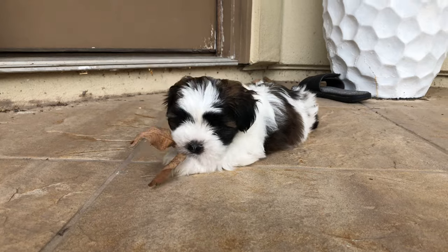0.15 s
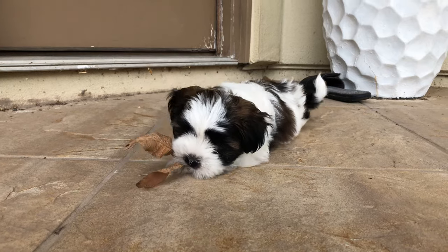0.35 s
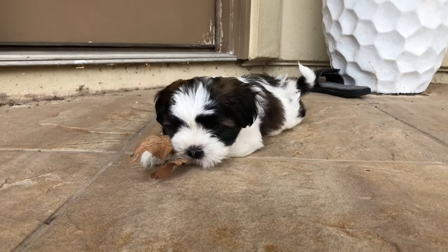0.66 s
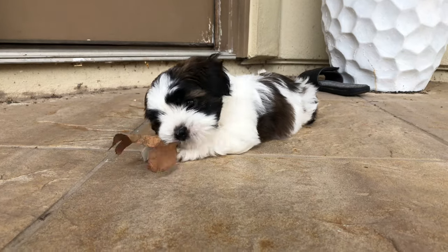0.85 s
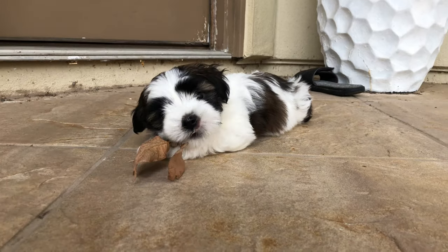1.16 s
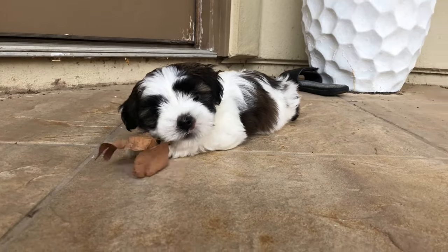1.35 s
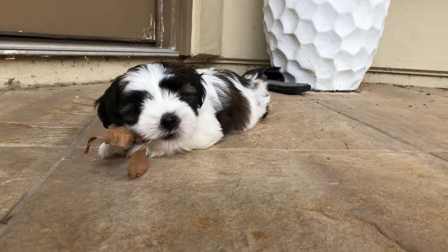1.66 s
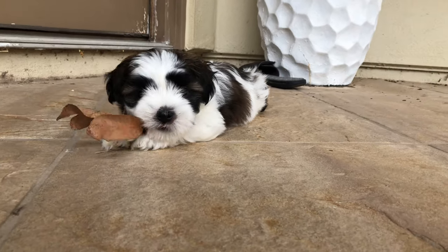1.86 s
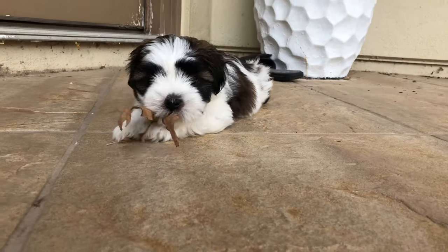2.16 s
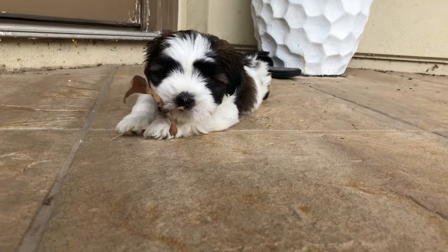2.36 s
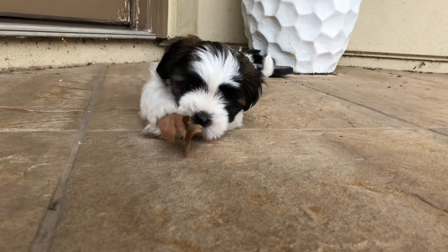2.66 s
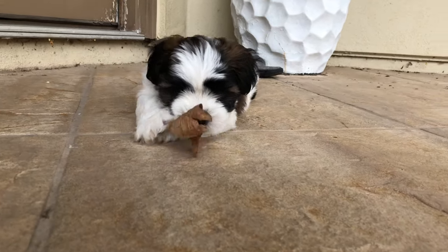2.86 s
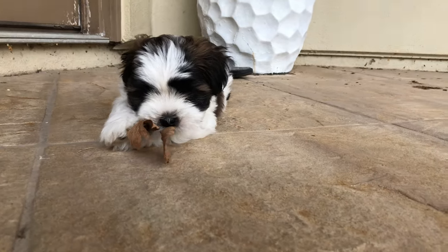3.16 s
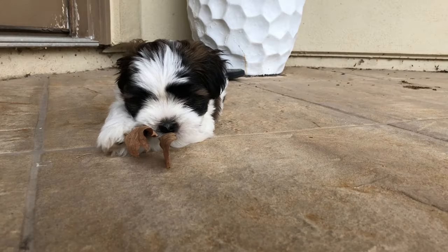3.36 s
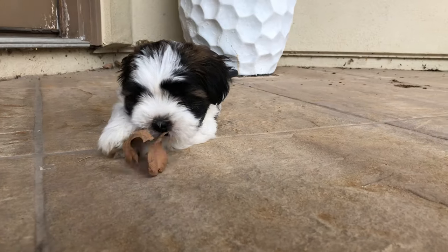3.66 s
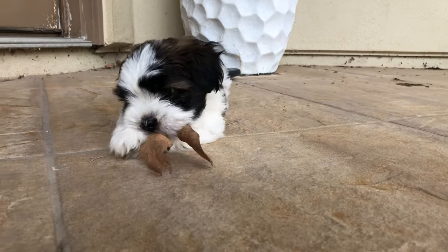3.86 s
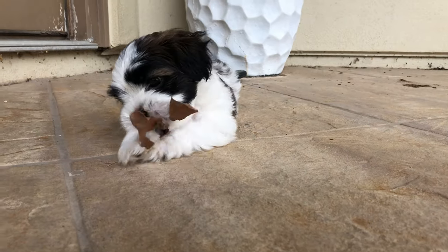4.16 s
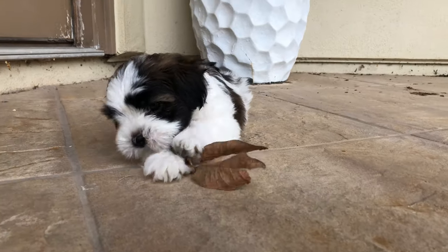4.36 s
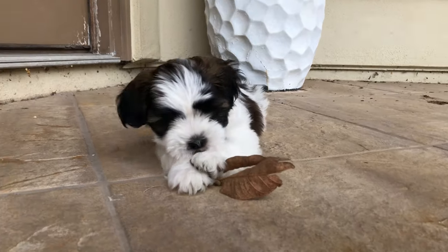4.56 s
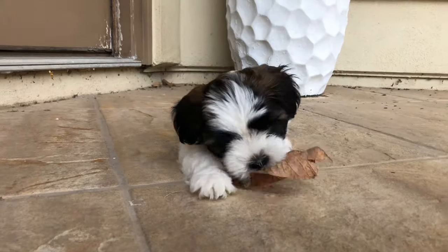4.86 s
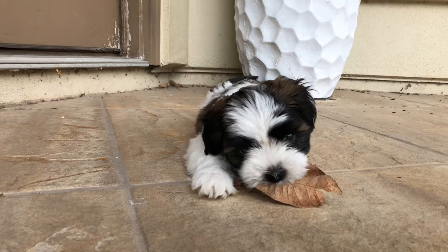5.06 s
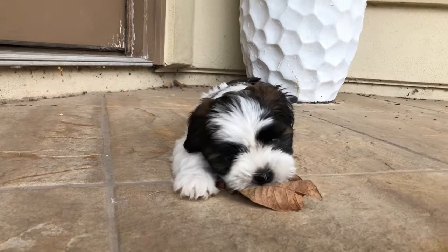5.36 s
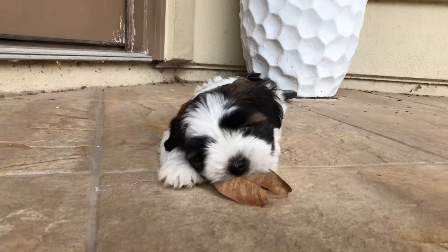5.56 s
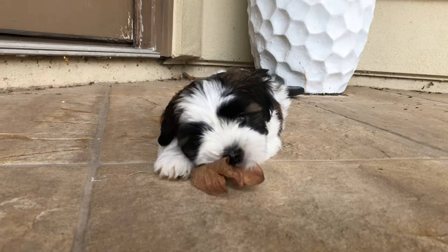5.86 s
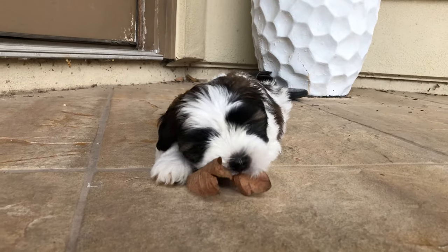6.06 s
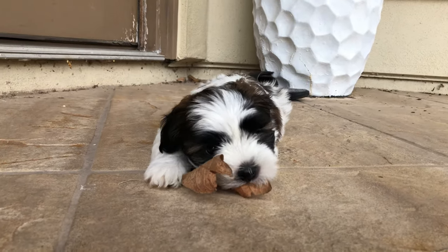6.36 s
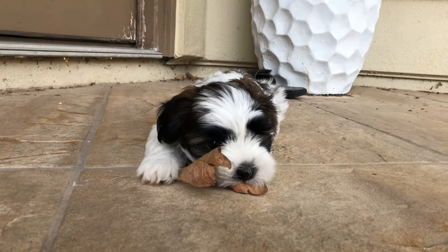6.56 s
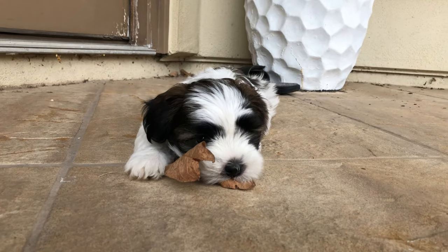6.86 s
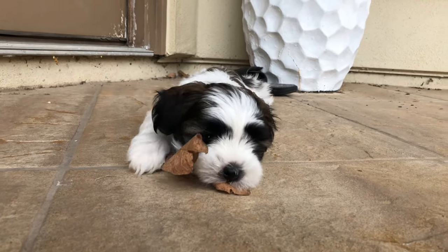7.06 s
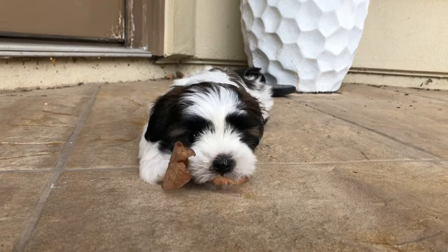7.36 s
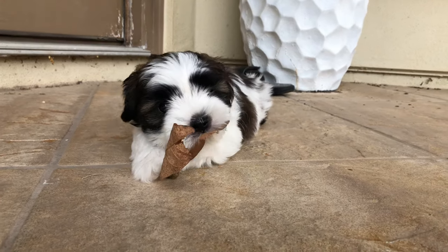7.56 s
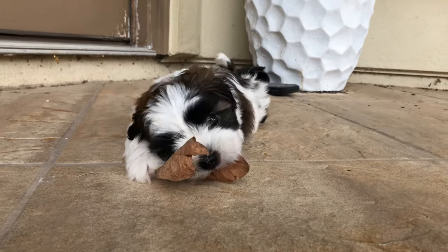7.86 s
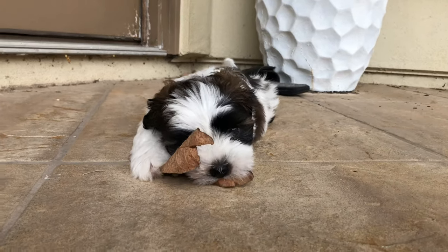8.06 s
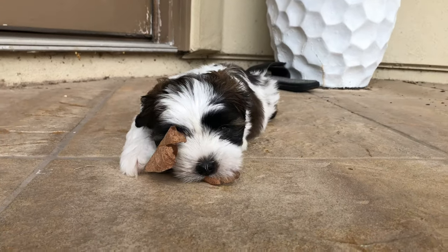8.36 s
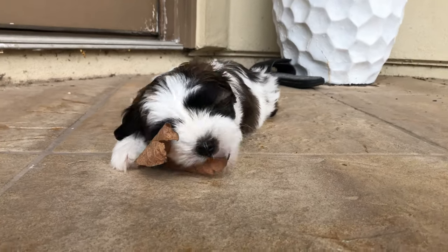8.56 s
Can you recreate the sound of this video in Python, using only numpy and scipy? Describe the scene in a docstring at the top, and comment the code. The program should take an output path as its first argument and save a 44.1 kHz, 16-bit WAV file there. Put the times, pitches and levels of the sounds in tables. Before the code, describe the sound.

Close, dry crackles of a brittle leaf being chewed by a puppy on a tiled porch. Small snaps and scrapes come in uneven bursts, thin out, then build to a dense, loud crunch past the middle before breaking into isolated sharp clicks. Behind them lie a steady high insect whirr, soft traffic and breeze, a faint low hum and a few distant bird whistles. Phone microphone near the floor, almost no echo.

```python
"""A tiled porch: a puppy chews a brittle dry leaf close to a phone held near the floor.
The leaf snaps (short noise runs through a resonance) and crackles and scrapes (dense coloured ticks).
Behind lie a distant bird (sliding sines), a steady high insect whirr (a comb of tones), a low hum
(a wavering sine) and far traffic and breeze (shaped noise)."""
import sys
import numpy as np
from scipy import signal
from scipy.fft import rfft, irfft, next_fast_len
from scipy.io import wavfile
from scipy.ndimage import uniform_filter1d

SR = 44100
rng = np.random.default_rng(int(sys.argv[2]) if len(sys.argv) > 2 else 0)


def generate_wav(signal):
    """Clip the signal to [-1, 1] and save it as 16-bit WAV at the path in sys.argv[1]."""
    frames = np.transpose(np.atleast_2d(signal))
    scaled = np.clip(frames, -1, 1) * 32767
    pcm = np.round(scaled).astype(np.int16)
    wavfile.write(sys.argv[1], SR, pcm)


def natural_amplitude(level_db):
    """Convert a level in decibels to a linear amplitude factor, elementwise."""
    exponent = np.asarray(level_db, float) / 20
    return 10 ** exponent


N = 384111


def on_log(hz, points):
    """Reads (Hz, dB) points on a log-frequency axis."""
    f, db = np.transpose(points)
    return np.interp(np.log(np.maximum(hz, 1)), np.log(f), db)


def walk(rate_hz):
    """Random levels of unit spread, rate_hz a second, joined by straight lines."""
    knots = rng.standard_normal(int(N / SR * rate_hz) + 2)
    return np.interp(np.arange(N) * rate_hz / SR, np.arange(len(knots)), knots)


def leaf(hz, ring_hz, body_db, treble_db, width, ring_db):
    """Response of the curled leaf: a broad slope with one main ringing hollow."""
    slope_db = on_log(hz, [(250, body_db - 11.5), (900, body_db + 1.0), (1700, body_db),
                           (2600, 0.0), (4800, 0), (7500, treble_db),
                           (11000, treble_db), (16000, treble_db - 5.5)])
    u = hz / ring_hz
    rings = 0
    # a smaller fold beside the hollow rings lower and weaker
    for gain, v in [(1, u), (0.14, 1.654 * u)]:
        rings = rings + gain * 1j * width * v / (1 - v ** 2 + 1j * width * v)
    return natural_amplitude(slope_db) * (1 + natural_amplitude(ring_db) * rings)


# Clear snaps of the leaf. Each row: peak time in s, level in dB, ring in Hz, body re middle in dB,
# treble re middle in dB, nominal length in ms (snaps() takes off 0.6).
SNAP_ROWS = [(.116, -46, 2960, 8, -5, 3.4), (.247, -41, 9000, 1, -2, 7), (.3539, -38, 2520, 5, -18, 3.3),
             (.425, -42, 4460, 5, 2, 6.8), (.481, -32, 4250, 2, -6, 4), (.5604, -35, 4030, -2.5, -9, 14),
             (.59, -34.5, 4100, -7, -20, 11), (.6868, -33.5, 3400, -13, -2, 4.4),
             (.695, -36, 3380, -13, -5, 2.4), (.741, -34, 3230, -11, 1, 2.4),
             (.7616, -34, 3700, -8, -6, 11), (.7826, -28.5, 3050, -1, -13, 12),
             (.7974, -36, 3020, -16, -21, 3.2), (.813, -32, 2800, 1, -16, 8.7),
             (.8383, -31.5, 3060, 4, -7, 2), (.8523, -37, 2910, -3, 13, 5.6),
             (.9302, -34.5, 3730, -6, -5, 2.2), (.955, -43, 2890, -8, -9, 2.2),
             (1.0799, -31.5, 2660, -3, -2.5, 2.5), (1.12, -45.5, 2000, 0, -10, 2.8),
             (1.1774, -35, 2820, 6, -3, 3.3), (1.228, -38, 2840, 12, 4, 3.9),
             (1.4498, -30, 3900, -15, 2, 9.3), (1.472, -34, 3040, -25, -7, 5.9),
             (1.5368, -28.5, 1880, 10, 8, 2.1), (1.554, -34, 1100, 9, 5, 5.1),
             (1.6148, -39.5, 10200, 5.5, -5, 2.4), (1.696, -44, 2970, -5, -2, 6.6),
             (1.9845, -44.5, 3150, 4, -4, 5.2), (2.0784, -44, 3570, 6, 2, 4),
             (2.0964, -42.5, 3750, 0.5, -10.5, 8.2), (2.2617, -40, 7100, -3, 5, 0.74),
             (2.7765, -37, 4970, -19.5, 5, 2.4), (2.8043, -34, 9750, -7, -2, .9),
             (2.8416, -31.5, 7000, -13, -8, 6), (2.9326, -42, 1980, -4, -21, 2.7),
             (2.9417, -35.5, 4540, -8, 5, 3.9), (2.993, -29, 5100, -17, 0, 6.9),
             (3.056, -30.5, 11300, -8, 6, 1.3), (3.0998, -38, 3870, -15, -10, 3.3),
             (3.737, -32, 7750, -17, -1, 13), (3.7972, -34.5, 7140, -17, 0, 2.8),
             (3.8154, -37, 3750, 15, 4, 8.4), (3.857, -37, 1960, 5, 3, 5), (3.8654, -37, 2370, 2, 6, 2.8),
             (3.9687, -40, 10380, 6, -6, 3.8), (4.2061, -35, 2540, -2, -0.5, 1.6),
             (4.3066, -40, 5510, -10, 2.5, 2.2), (4.3893, -17.5, 4420, 4.5, 0, 1.7),
             (4.4087, -12, 2430, -4, -4.5, 5.3), (4.4681, -30, 1440, 4, -17, 2.4),
             (4.8598, -36, 3800, 3, -4, 5.8), (4.8866, -21, 3170, 4, -8, .7),
             (4.9389, -29.5, 2750, 3, 2, 9.1), (4.9781, -33, 1510, 2.5, -19, 1.7),
             (5.107, -37, 4070, 6, -2, 3.7), (5.1215, -32, 3400, 4, -3.5, 5),
             (5.1411, -19, 3760, -12, -3, 1.7), (5.1504, -21.5, 3450, -3, -1, 1.9),
             (5.1551, -21, 5860, 10, 8, 1.5), (5.1613, -12, 6740, -6.5, -4.5, 2.2),
             (5.2101, -27, 3660, -8, 0, 1.6), (5.3176, -37, 1390, 0, -21, 2.4),
             (5.364, -34, 2760, -5, -2, 1.3), (5.3834, -35.5, 7550, 0, -5, 5.4),
             (5.4249, -32.5, 6290, -2, -4, 1.7), (5.4295, -30.5, 3510, 3, 0, 2.4),
             (5.4496, -30, 3670, -6, -5, 2.1), (5.4555, -30.5, 4150, 5, -3, 5.1),
             (5.488, -20, 2970, -5, -1, 3), (5.5054, -17.5, 3950, -9, -3, 3.4),
             (5.5155, -25, 3450, -8, -7, 5.1), (5.5247, -28, 3080, 3, 2, 2.4),
             (5.5414, -16.5, 3250, -8.5, -3, 5), (5.5606, -24.5, 3200, -1, -4, 2.5),
             (5.5669, -27, 2290, -11, -7, 3.2), (5.577, -26, 3210, -14, -3, 3.4),
             (5.5944, -32.5, 2330, 2, -5, 2.7), (5.6085, -14.5, 3430, -1.5, -2.5, 4.7),
             (5.623, -30, 3500, 11, -2, 5), (5.636, -21, 6500, -5, -4, 6.4),
             (5.647, -23.5, 3330, -3, -5, 6.4), (5.6786, -21, 3220, 3.5, -1.5, 4.5),
             (5.7525, -31, 3800, 1.5, -4, 4.4), (5.7655, -24, 3280, 1.5, -1, 6.6),
             (5.8211, -32, 3400, 5, -2.5, 7.6), (5.8927, -34.5, 5170, -14.5, -1.5, 1.2),
             (5.8988, -30.5, 2500, -9, -2, 1.3), (5.9362, -32, 6290, -9, 4, 2.8),
             (6.0361, -36.5, 5770, 12, 2, 2.4), (6.1025, -33.5, 1490, 2, -10, 3),
             (6.1148, -35, 1420, 3, -10, 1.1), (6.1354, -34.5, 1420, 9, -11, 1.9),
             (6.1557, -34, 1170, 13, 5, 0.71), (6.1605, -21.5, 3530, 2, 2, 0.68),
             (6.167, -27, 1380, 2, -7, 2.1), (6.1838, -35, 1590, 4, 9, 2.7), (6.1878, -40, 1340, 9, 3, 1.8),
             (6.2167, -30.5, 1480, 6, -7, 2.7), (6.2422, -33.5, 3510, -3, 3, 1.2),
             (6.2781, -42.5, 2630, 5, -2, 1.8), (6.362, -38, 3720, 4, -10, 5.8),
             (6.462, -19, 11400, 0.5, -2, 2.7), (6.4911, -38, 5880, -14.5, 11, 1.3),
             (6.5276, -24.5, 9700, -6, -5, 1.9), (6.5382, -28, 3060, -19, 10, 1.6),
             (6.5475, -33.5, 2910, -8.5, 2, 1.3), (6.5795, -39, 8310, -19, -2.5, 1.5),
             (6.5925, -35, 8530, -11, 1, 1.3), (6.962, -44, 2930, -9, -10, 2),
             (6.9765, -44, 2900, -11.5, -10, 2.7), (6.99, -36, 2900, -11, -15, 1.4),
             (7.1012, -13, 9400, -12.5, 2, 2), (7.1183, -35, 3600, 4.5, -16, 1.3),
             (7.19, -36.5, 5750, 2.5, 12, 1), (7.3487, -37.5, 4930, 7, 2.5, 1.9),
             (7.3646, -42, 6120, 5, 8, 2), (7.541, -43.5, 4460, -5, -6, 1.6),
             (7.5858, -14.5, 5020, -9.5, 5, 1.7), (7.792, -41, 6400, 4, -5, 3.5),
             (7.9685, -29, 4840, 1.5, -17, 2.1), (8.007, -32, 3320, 4, -3, 2.8),
             (8.0497, -13.5, 10100, -11, 1.5, 2.4), (8.063, -29, 9840, -10, -10, 1.7),
             (8.0737, -31, 9840, -6, 1, 1.2), (8.0793, -22, 2570, -7, 5, 1.7),
             (8.1081, -37, 4010, -36, 2, 1.4), (8.1291, -19, 11600, -18, -5, 1.1),
             (8.1366, -29, 5790, -12, -5, 1.3), (8.1522, -32, 6010, -8, 6, 0.9),
             (8.1585, -15, 4550, -14, 1.5, 0.75), (8.2522, -39, 1380, -1, -21, 3.3),
             (8.456, -39, 1210, 0, 6, 1.9), (8.59, -34, 4610, -12, 6, 1.2),
             (8.6245, -18.5, 2740, -9, -12, 3.8), (8.6317, -38, 6600, -12, -2, 4.5),
             (8.6666, -33, 2930, 6, -10, 3.9)]


def snaps():
    """Each snap is a quick run of tiny fractures that swells, dies away and rings the leaf."""
    size, lead = 2048, 256  # samples
    out = np.zeros(N + size)
    t_ms = (np.arange(size) - lead) / SR * 1000
    hz = np.fft.rfftfreq(size, 1 / SR)
    chance = rng.standard_normal((len(SNAP_ROWS), 2, size))
    for row, (noise, scatter) in zip(SNAP_ROWS, chance):
        peak_s, level_db, ring_hz, body_db, treble_db, nominal_ms = row
        ms = max(nominal_ms - .6, .25)
        run = np.where(t_ms < 0, np.exp(t_ms / (.22 * ms)), np.exp(-t_ms / (.65 * ms)))
        fractures = run * noise * natural_amplitude(5.6 * scatter)
        response = leaf(hz, ring_hz, body_db, treble_db, width=0.087, ring_db=8.4)
        snap = irfft(rfft(fractures) * response)
        loudest_rms = np.sqrt(uniform_filter1d(snap ** 2, size=40).max())
        i = int(peak_s * SR) - lead
        out[i:i + size] += natural_amplitude(level_db) * snap / loudest_rms
    return out[:N]


# Bites and pushes that crease the leaf. Each row: peak time in s, level in dB, leaf ring in Hz,
# treble re middle in dB, time to swell 20 dB in s, time to fade 20 dB in s (crunch_db() floors both).
CRUNCH_ROWS = [(.247, -58.5, 3540, 4.5, 0.3, .1), (.36, -58.5, 3490, 3, -0.36, 0.6),
               (.44, -63, 4500, -5, 0.4, 1.5), (0.469, -41, 2600, -7, .015, 0.15),
               (0.49, -38.5, 4180, -8.5, 0.05, 0), (.57, -41, 4090, -11, 0.03, -0.05),
               (0.679, -43, 4830, -2, 0.07, 0.01), (.75, -43, 3300, 0, 0.06, -0.02),
               (.8, -39, 3000, -5.5, 0.12, 0.14), (1.085, -57.5, 2800, -13, 0.2, 0.7),
               (1.177, -43.5, 2820, -3, 0.04, 0.22), (1.231, -46, 1390, -9, 0.13, 0.02),
               (1.39, -54, 2500, -2, -0.7, 0.66), (1.435, -47.5, 3830, -3, -0.22, 0.16),
               (1.546, -44, 2000, -9, 0.02, 0.11), (1.63, -49.5, 1450, -19, 0.15, 0.1),
               (1.77, -64.5, 1610, -12, .06, 0.4), (1.995, -62, 3100, -5, 0.2, -0.07),
               (2.1, -63, 3670, -2, 0.46, 0.2), (2.368, -60, 1700, -4, 0.3, 0.4),
               (2.759, -44.5, 3480, -4, -0.03, 0.1), (2.836, -47.5, 2480, -4.5, 0.18, 0.27),
               (2.95, -49.5, 3460, -1, .03, 0.27), (3.06, -55, 2600, -10, 0.26, .5),
               (3.74, -59, 2620, -6, 0.23, 0.3), (3.81, -47, 3530, -1, 0.08, 0.22),
               (3.865, -51.5, 2330, -6, 0.23, 0.22), (4.0, -65.5, 3000, 5, -0.4, 0.8),
               (4.22, -58, 2840, -1, -0.04, 0.7), (4.33, -62, 2860, 0, -0.1, 0.7),
               (4.412, -34, 2480, -9, 0.02, 0.0849), (4.484, -37, 4000, -3.5, 0.02, .04),
               (4.835, -51, 4150, -10, 0.3, .06), (4.9, -37.5, 2070, -7, 0.04, .035),
               (4.943, -32.5, 4100, 0, -0.01, -0.04), (4.98, -50.5, 2300, -13, 0.24, 0.12),
               (5.159, -32.5, 3650, -3.5, -0.0227, .06), (5.35, -51.5, 3720, -8, 0.4, 0.4),
               (5.45, -47, 4130, -10, -0.48, 0.2), (5.504, -24, 4150, 1.5, -0.016, -0.01),
               (5.567, -44, 2970, -6, -0.11, 0.33), (5.626, -27.5, 3620, 3, -0.04, -0.0019),
               (5.683, -32.5, 3400, -5, -0.18, -0.11), (5.76, -40, 3530, -6, -0.48, 0.06),
               (5.8, -51, 3300, -5, 0.2, 0.25), (5.9, -60, 2450, -4, -0.2, .12),
               (6.11, -42.5, 1530, -25, 0.05, -0.59), (6.186, -35, 1600, -5, 0.04, .075),
               (6.39, -54, 3900, -9, 0.2, 0.33), (6.465, -55.5, 1250, 1, 0.24, 0.17),
               (6.53, -53.5, 2630, 5, 0.26, 0.16), (6.69, -59, 2970, -9, 0.2, 0.13),
               (6.995, -52.5, 2970, -24.5, 0.1, 0.13), (7.108, -40.5, 3600, -2, 0.02, 0.04),
               (7.228, -53.5, 2460, -10, 0.13, 0), (7.33, -52, 1700, -6.5, 0.18, 0),
               (7.48, -55.5, 2700, -4.5, .08, 0.1), (7.535, -53.5, 4400, -2, 0.36, 0.24),
               (7.595, -57, 4860, 3, -0.1, 0.37), (7.71, -46, 2940, 2.5, -0.12, 0.03),
               (7.79, -54, 3700, 2, 0.16, -0.1), (8.005, -54.5, 3320, -2, 0.2, 0.4),
               (8.06, -51.5, 4420, 5, 0.24, 0.14), (8.16, -52.5, 4850, 4, 0.25, 0.15),
               (8.23, -75, 3830, -9, -7.9, 12), (8.626, -53, 2870, 2, 0.16, 0.2),
               (8.663, -50, 1500, -6, 0.08, -0.1)]


def crunch_db(t):
    """Level of every crunch over time: a swell to the peak, then a fade, both straight in dB."""
    peak_s, level_db, _, _, swell_s, fade_s = np.transpose(CRUNCH_ROWS)[:, :, None]
    slope_s = np.maximum(np.where(t > peak_s, fade_s, swell_s), .005)
    return level_db - 20 * np.abs(t - peak_s) / slope_s


# Fullness of the leaf by its ring. Each row: ring in Hz, body re middle in dB.
BODY_BY_RING = [(1500, 4), (4000, 1.5)]
TICKS_PER_S, TICK_SPREAD_DB = 8000, .5
BUNCHES_PER_S, BUNCH_MS, BUNCH_SPREAD_DB, BETWEEN_DB = 350, 2.5, 2, -7
RING_WIDTH, RING_DB = .13, 5


def rustle():
    """Dense uneven ticks of creasing and scraping; the hollow they ring changes as the leaf is bent."""
    ticks = (rng.random(N) < TICKS_PER_S / SR) * rng.standard_normal(N)
    ticks = ticks * natural_amplitude(TICK_SPREAD_DB * rng.exponential(size=N))
    starts = (rng.random(N) < BUNCHES_PER_S / SR) * natural_amplitude(BUNCH_SPREAD_DB * rng.standard_normal(N))
    bunches = signal.lfilter([1], [1, -np.exp(-1000 / BUNCH_MS / SR)], starts)
    ticks = ticks * (natural_amplitude(BETWEEN_DB) + bunches)

    grid_s = np.arange(0, N / SR, .001)
    effort = np.sqrt(np.sum(natural_amplitude(crunch_db(grid_s)) ** 2, axis=0))
    ticks = ticks / ticks.std() * np.interp(np.arange(N) / SR, grid_s, effort)

    hz, frame_s, z = signal.stft(ticks, SR, nperseg=512, noverlap=384)
    band = (hz > 1200) & (hz < 5200)  # crunch levels hold for this band
    colours = []
    for _, _, ring_hz, treble_db, *_ in CRUNCH_ROWS:
        body_db = on_log(ring_hz, BODY_BY_RING)
        colour = leaf(hz, ring_hz, body_db, treble_db, RING_WIDTH, RING_DB)
        colours.append(colour / np.sqrt(np.sum(np.abs(colour[band]) ** 2) / len(hz)))
    # the loudest crunch sets the leaf's shape
    loudest = crunch_db(frame_s).argmax(axis=0)
    z = z * np.array(colours)[loudest].T
    return signal.istft(z, SR, nperseg=512, noverlap=384)[1][:N]


# Whistled notes. Each row: start in s, length in s, first pitch in Hz, last pitch in Hz,
# level in dB (before swell and waver).
BIRD_NOTES = [(2.54, .045, 4450, 4200, -68), (2.585, .185, 4110, 4170, -59), (4.0, .04, 4050, 4050, -63),
              (4.0, .04, 4500, 4500, -65), (4.985, .13, 3460, 3650, -53), (6.21, .06, 4780, 4700, -55),
              (6.35, .11, 4460, 4190, -51), (6.48, .145, 3330, 3120, -59)]
# a note is loudest this far in and this much softer at its ends
SWELL_SHARE, SWELL_DB = .45, 7


def bird():
    """Thin, slightly wavering whistles: sines that slide from one pitch to another."""
    out, t = np.zeros(N), np.arange(N) / SR
    for start_s, length_s, first_hz, last_hz, level_db in BIRD_NOTES:
        end_s = start_s + length_s
        edge = np.clip(np.minimum(t - start_s, end_s - t) / 0.015, 0, 1)
        hz = np.interp(t, [start_s, end_s], [first_hz, last_hz])
        loudest_s = start_s + SWELL_SHARE * length_s
        swell_db = np.interp(t, [start_s, loudest_s, end_s], [-SWELL_DB, 0, -SWELL_DB])
        phase = 2 * np.pi * np.cumsum(hz * (1 + 0.0025 * walk(47))) / SR
        level = np.sqrt(2) * natural_amplitude(level_db + swell_db + 2.3 * walk(50))
        out += edge * level * np.sin(phase)
    return out


# Click rate of the insects. Each row: time in s, rate in Hz.
CLICK_RATE = [(0, 508.08), (2, 508.12), (3.3, 507.92), (4.3, 507.28), (5.5, 507.13), (6.7, 507.17),
              (7.4, 507.48), (8.71, 507.52)]
# Envelope of the comb. Each row: frequency in Hz, tone level in dB (before pairing, throb and fades).
TONE_LEVELS = [(5100, -101), (5600, -71), (6100, -70.5), (6600, -74.5), (7200, -66.5), (7700, -69),
               (8300, -73.5), (9150, -67), (10600, -69), (11200, -88.5), (12000, -98.5)]
THROB_HZ = 69.85
BAND_SWELL_DB, SHARED_SWELL_DB, OWN_SWELL_DB = 1.5, 1.5, 3.5  # four tones, tone with sides, each alone
SWELLS_PER_S = 2.5


def whirr():
    """Very even clicks in slightly unevenly spaced pairs, with a fast throb: a comb with side tones."""
    t = np.arange(N) / SR
    time_s, rate_hz = np.transpose(CLICK_RATE)
    pair = np.exp(1j * np.pi * np.cumsum(np.interp(t, time_s, rate_hz)) / SR)  # half the click rate
    throb = np.exp(2j * np.pi * THROB_HZ * t)
    sides = {n: throb ** n for n in range(-2, 3)}
    steps = t * SWELLS_PER_S
    knots = int(steps[-1]) + 2
    bands_db = BAND_SWELL_DB * rng.standard_normal((8, knots)).repeat(4, axis=0)
    out, tone = np.zeros(N), pair ** 18
    for m in range(19, 48):
        tone = tone * pair
        khz = m * rate_hz.mean() / 2000
        # uneven spacing adds odd multiples of the pair rate, stronger higher up
        odd_db = (m % 2) * np.interp(khz, [7.5, 9.3], [-9, -1.5])
        # higher up the throb spreads power to the side tones
        outer_db = np.interp(khz, [5.5, 8, 10.5], [-22, -13, -5])
        centre_db = np.interp(khz, [8.5, 10.5], [0, -8])
        side_db = centre_db, 0, outer_db
        shared_db = bands_db[m - 19] + SHARED_SWELL_DB * rng.standard_normal(knots)
        for n in range(-2, 3):
            db = on_log(1000 * khz, TONE_LEVELS) + odd_db + side_db[abs(n)]
            # each tone also fades alone on its way through moving air and leaves
            own_db = OWN_SWELL_DB * rng.standard_normal(knots)
            fade = np.interp(steps, np.arange(knots), natural_amplitude(db + shared_db + own_db))
            start_phase = np.exp(2j * np.pi * rng.random())
            out += fade * (tone * sides[n] * start_phase).real
    return out


HUM_HZ, HUM_DB = 57.5, -72  # means


def hum():
    """A faint low machine hum: a sine that wavers in pitch and level."""
    hz = HUM_HZ * (1 + 0.0294 * walk(3))
    level = np.sqrt(2) * natural_amplitude(HUM_DB + 2.5 * walk(3.78))
    return level * np.sin(2 * np.pi * np.cumsum(hz) / SR)


# Spectrum of the air, relative. Each row: frequency in Hz, density in dB per Hz.
AIR_SPECTRUM = [(20, -18.5), (55, 0.5), (120, -0.5), (250, -2.5), (700, -8), (1000, -16.5), (2500, -23.5),
                (4500, -29.5), (5500, -26.5), (7200, -14), (10000, -22), (11300, -17.5), (12300, -41),
                (15500, -33)]
AIR_DB = -52  # mean level


def air():
    """Far traffic and breeze: smooth noise whose level drifts a little."""
    size = next_fast_len(N)
    shape = natural_amplitude(on_log(np.fft.rfftfreq(size, 1 / SR), AIR_SPECTRUM))
    x = irfft(rfft(rng.standard_normal(size)) * shape, size)[:N]
    return natural_amplitude(AIR_DB + 0.72 * walk(1.47)) * x / x.std()


def porch(x):
    """Tile and door send back a short faint tail, dull from the rough walls."""
    t = np.arange(int(.15 * SR)) / SR
    decay = np.exp(-np.log(1000) * t / .12)  # 60 dB in 0.12 s
    echo = natural_amplitude(-48) * rng.standard_normal(len(t)) * decay * (t > .002)
    echo = signal.lfilter([1], [1, -.6], echo)
    echo[0] = 1  # direct sound
    return signal.fftconvolve(x, echo)[:N]


def scene():
    """Leaf and bird sound through the porch; insects, hum and air are all around."""
    through_porch = porch(snaps() + rustle() + bird())
    return (through_porch + whirr() + hum() + air())[None]


def top_cut(x):
    """Nothing passes above the cut-off."""
    return signal.sosfilt(signal.butter(12, 17020, fs=SR, output="sos"), x)


def record(dry):
    """Most of what lies above about 16 kHz is dropped."""
    size = next_fast_len(N)
    hz = np.fft.rfftfreq(size, 1 / SR)
    top_db = on_log(hz, [(15750, 0), (15950, -19), (16500, -23), (16800, -48)])
    mix = irfft(rfft(dry, size) * natural_amplitude(top_db), size)[:, :N]
    return top_cut(mix)


dry = scene()
out = record(dry)
generate_wav(out)
```